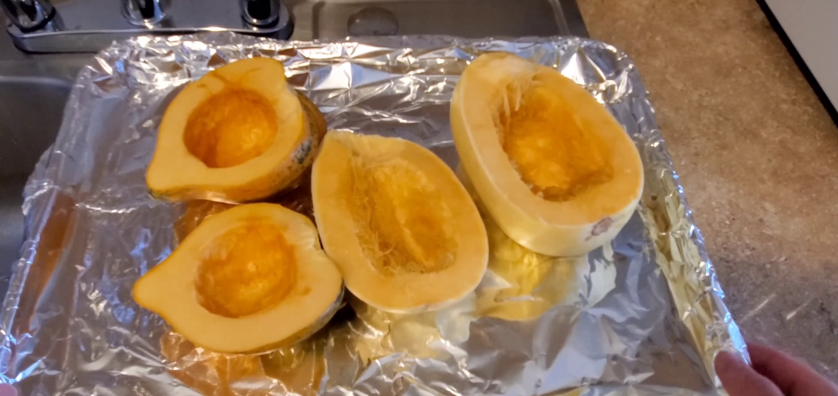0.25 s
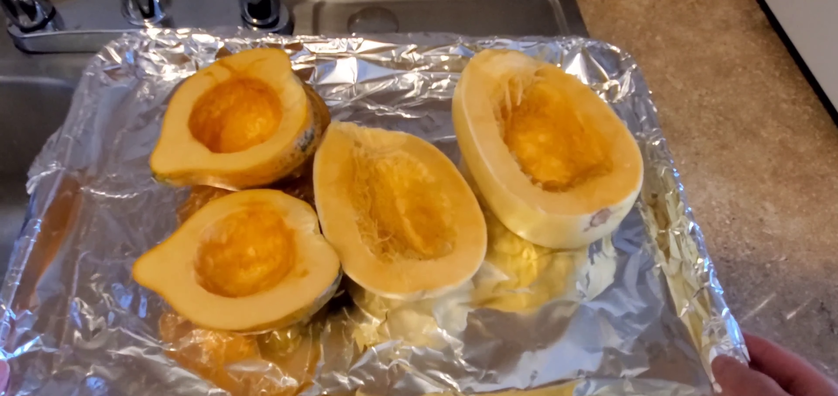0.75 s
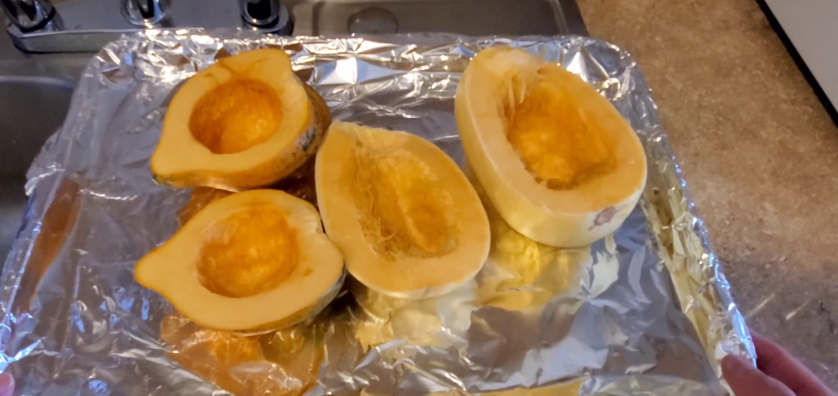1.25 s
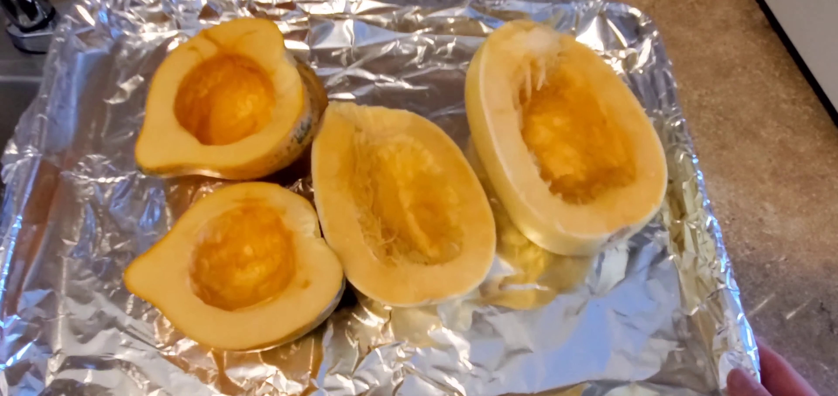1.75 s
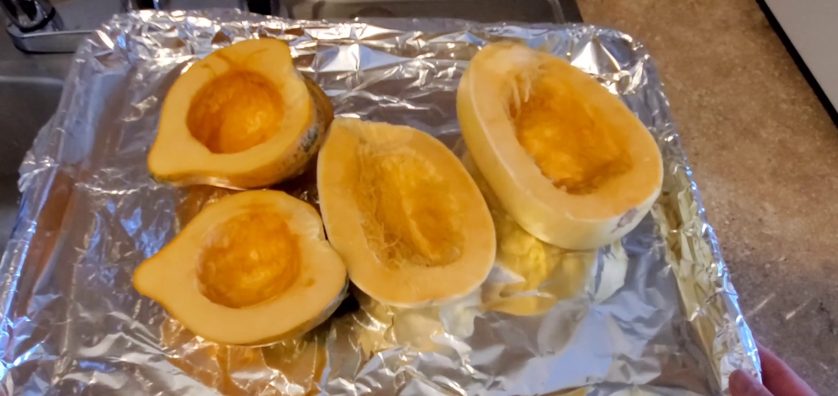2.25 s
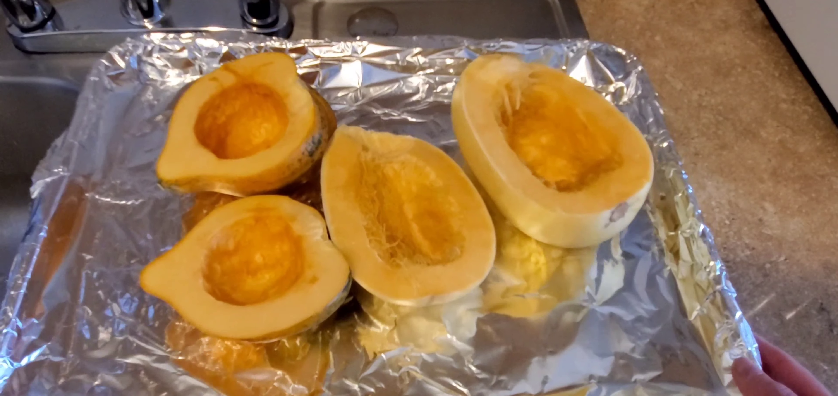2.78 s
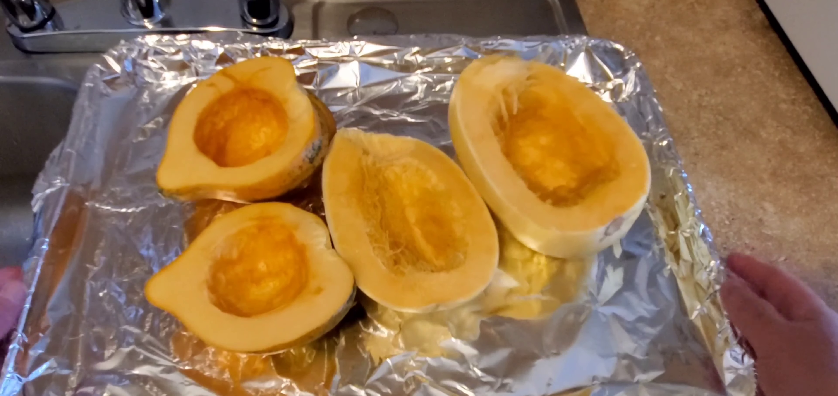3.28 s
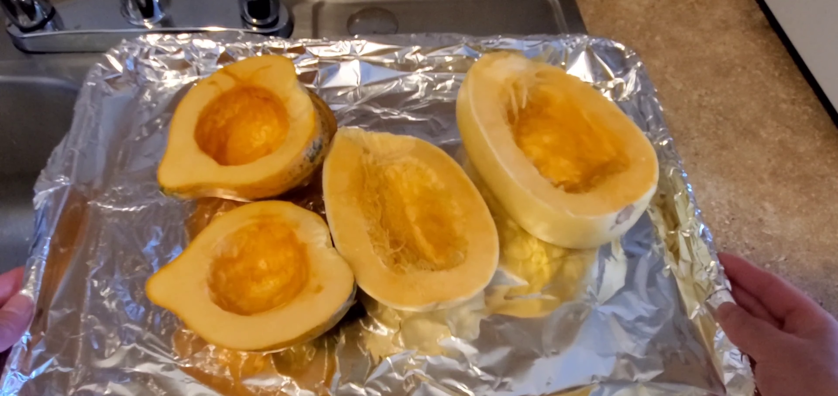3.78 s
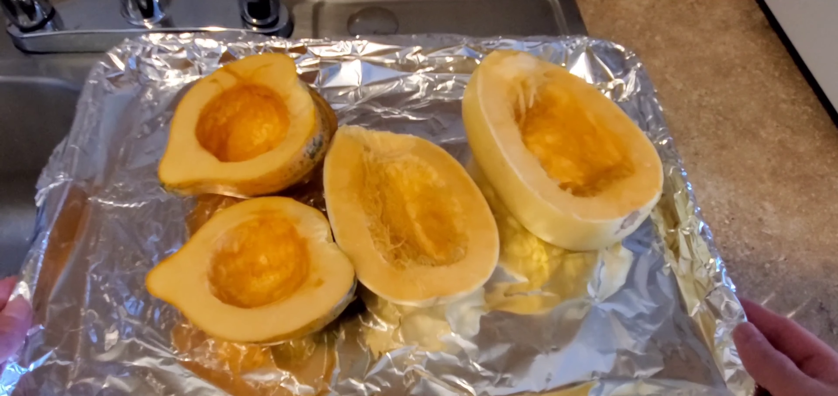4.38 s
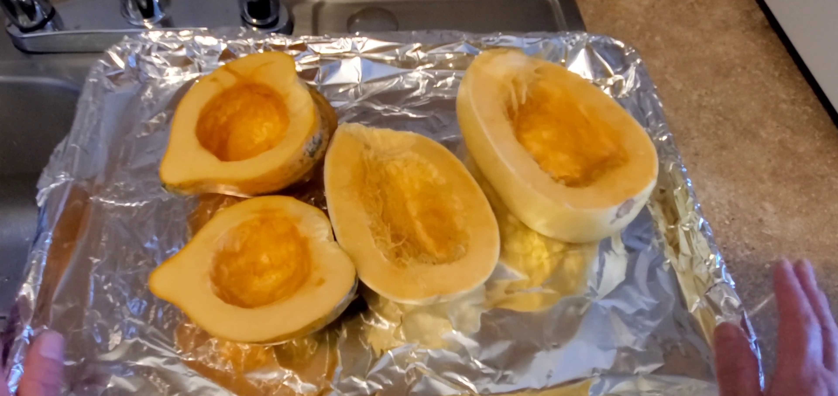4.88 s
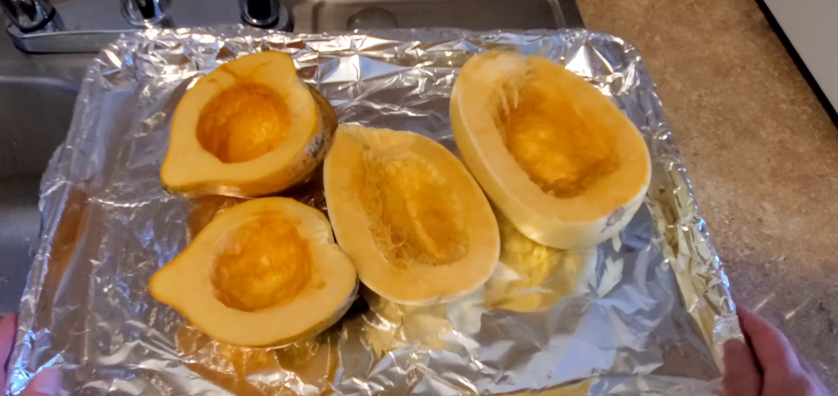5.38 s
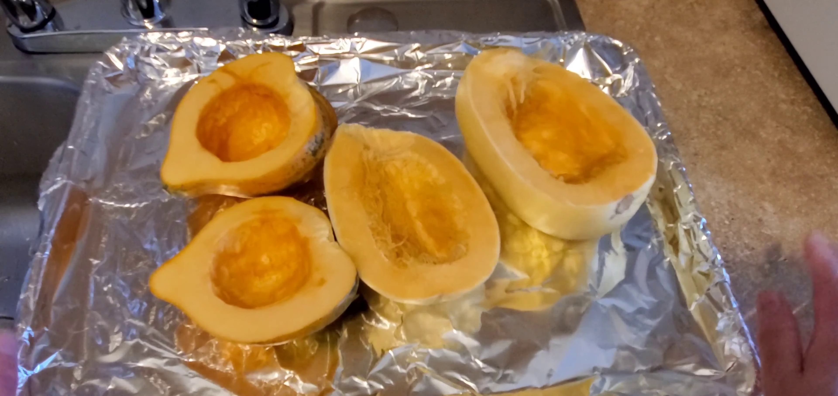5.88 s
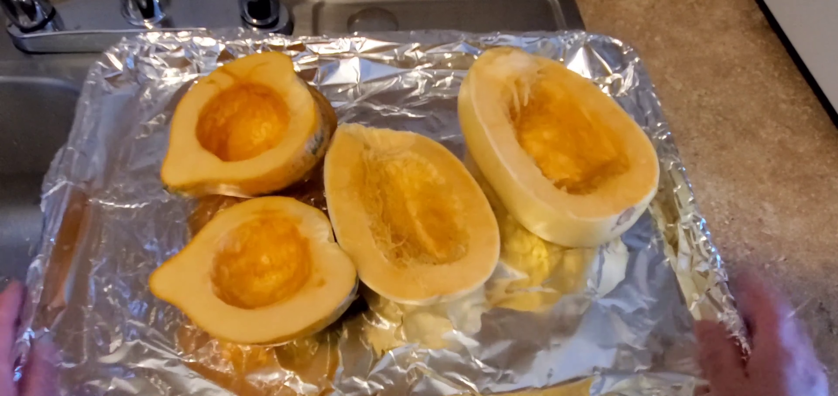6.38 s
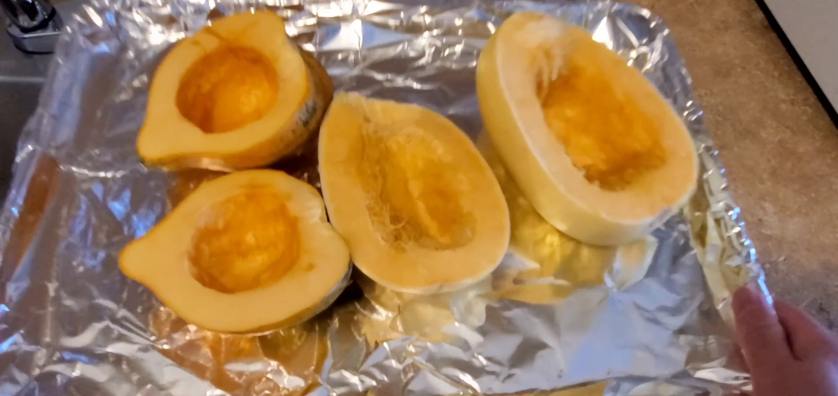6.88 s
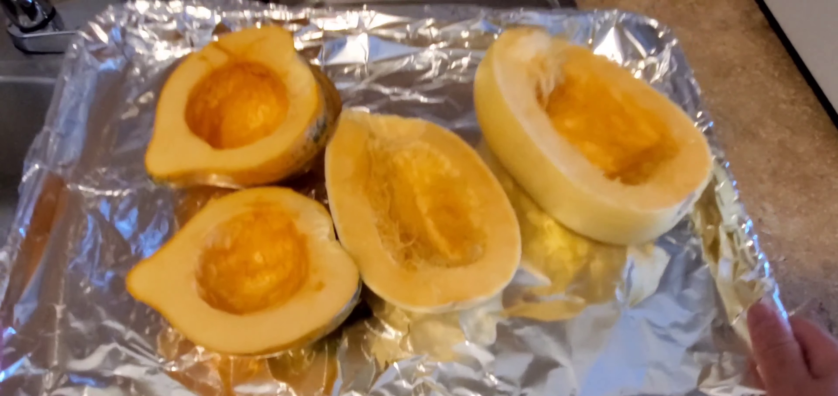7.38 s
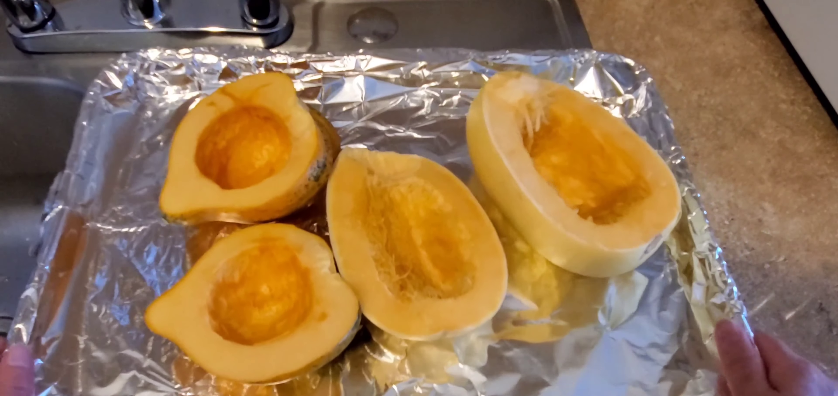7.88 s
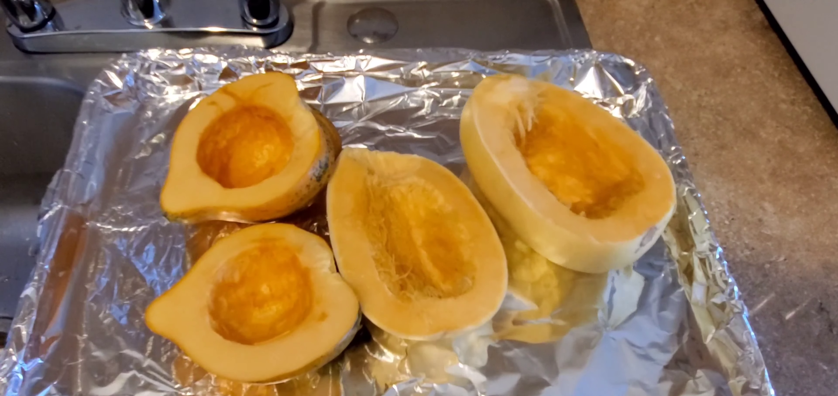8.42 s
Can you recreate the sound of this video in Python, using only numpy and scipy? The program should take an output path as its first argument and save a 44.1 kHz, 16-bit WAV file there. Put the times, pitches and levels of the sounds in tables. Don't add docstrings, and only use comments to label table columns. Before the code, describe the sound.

Aluminium foil crackles, snaps and rustles under moving hands on a loaded baking tray, with metallic knocks and low booms over a quiet kitchen hum.

```python
import sys
import numpy as np
from scipy import signal
from scipy.fft import rfft, irfft, next_fast_len
from scipy.io import wavfile
from scipy.ndimage import uniform_filter1d

SR = 44100
rng = np.random.default_rng(int(sys.argv[2]) if len(sys.argv) > 2 else 0)


def linear_from_db(decibels):
    return 10 ** (np.asarray(decibels, float) / 20)


def generate_wav(sig):
    pcm = np.round(np.clip(np.atleast_2d(sig).T, -1, 1) * 32767).astype(np.int16)
    wavfile.write(sys.argv[1], SR, pcm)


N = 381465
LEFT_HAND_LAG_SAMPLES, RIGHT_HAND_LAG_SAMPLES = -12, 6


def rms_one(x):
    return x / np.sqrt(np.mean(x ** 2) + 1e-20)


def in_time(rows):
    s, level_db = np.transpose(rows)
    return np.interp(np.arange(N) / SR, s, level_db)


def at_hz(points, hz):
    point_hz, value = np.transpose(points)
    return np.interp(np.log(hz + 1), np.log(point_hz), value)


def sides(pan_db):
    return linear_from_db(np.array([.5 * pan_db, -.5 * pan_db]))


def add_at(out, s, sound):
    out[..., round(s * SR):][..., :sound.shape[-1]] += sound


def ring(clicks, hz, t60):
    radius = linear_from_db(-60 / (max(t60, .01) * SR))
    w = 2 * np.pi * hz / SR
    return signal.lfilter([0, np.sin(w)], [1, -2 * radius * np.cos(w), radius ** 2], clicks + 1e-18)


def buckles(count, per_s, spread_db):
    sizes = linear_from_db(spread_db * np.minimum(rng.exponential(1, count), 4)) * rng.choice([-1, 1], count)
    return sizes * (rng.random(count) < per_s / SR)


# frequency in Hz, density in dB per Hz.
AIR_COLOUR = [(12, -39), (20, -24), (43, -3), (91, -14), (233, -7.5), (329, -5.5), (439, -11), (498, -18),
              (545, -11), (586, -15.5), (1500, -27.5), (1950, -71), (3300, -120)]
# frequency in Hz, density in dB per Hz.
HISS_COLOUR = [(880, -24), (1500, 0.5), (3660, -16.5), (6050, -31), (6620, -27), (15100, -19), (16500, -31)]
# frequency in Hz, density in dB per Hz.
LATE_HISS_COLOUR = [(1500, -30), (2300, -8), (3600, -10), (5500, -12), (8500, -20), (12000, -13),
                    (15700, -18), (16500, -40)]
# frequency in Hz, likeness from 0 to 1.
AIR_LIKENESS = [(60, 0.74), (240, 1), (950, 0.61), (3770, 0.19), (15000, 0.04)]
# frequency in Hz, width in Hz, level in dB.
HUM_LINES = [(436.9, 4.1, -63), (545, 11, -71.5), (320, 17, -67.5)]


def air():
    air_db, hiss_db, late_hiss_db = -57, -75, -69.5
    whine_hz, whine_db, whine_late_db = 1179, -81.5, -69.5
    up_s, rise_s = 8.2, 0.09
    t, fast = np.arange(N) / SR, next_fast_len(N)
    late = np.interp(t, [up_s - rise_s, up_s + rise_s], [0, 1])
    hz = np.fft.rfftfreq(fast, 1 / SR)
    alike = np.clip(at_hz(AIR_LIKENESS, hz), 0, 1)
    layers = (
        (AIR_COLOUR, air_db),
        (HISS_COLOUR, hiss_db),
        (LATE_HISS_COLOUR, late_hiss_db - 40 * (1 - late) ** 3),
    )
    out = np.zeros((2, N))
    for colour, level_db in layers:
        mid, side = rfft(rng.standard_normal((2, fast)))
        pair = np.sqrt(1 + alike) * mid + np.sqrt(1 - alike) * side * [[1], [-1]]
        noise = irfft(pair * linear_from_db(at_hz(colour, hz)), fast)[:, :N]
        out += linear_from_db(level_db) * rms_one(noise)
    for line_hz, width_hz, line_db in HUM_LINES:
        out += linear_from_db(line_db) * rms_one(ring(rng.standard_normal((2, N)), line_hz, 1.8 / width_hz))
    whine = np.sqrt(2) * np.sin(2 * np.pi * whine_hz * t)
    return out + linear_from_db(whine_db + (whine_late_db - whine_db) * late) * whine


# frequency in Hz, density in dB per Hz.
FOIL_COLOUR = [(290, -42), (500, -13.5), (980, -11.5), (1120, -4.5), (1870, -7.5), (2320, -6), (4050, -6.5),
               (6380, -11), (15100, -17.5), (15800, -21.5), (16500, -57)]


def sheet_ring(clicks, t60, low_db, top_db, lag, alike, facets_db):
    low_hz, top_hz = 1800, 8000
    damped_s = 0.12
    size = len(clicks)
    fast = next_fast_len(size)
    hz, t = np.fft.rfftfreq(fast, 1 / SR), np.arange(5000) / SR
    same, left, right = rfft(rng.standard_normal((3, fast)))
    late = np.exp(-2j * np.pi * hz * lag / SR)
    shared = same * np.array([late, np.ones_like(late)])
    pair = np.sqrt(alike) * shared + np.sqrt(1 - alike) * np.array([left, right])
    facets = np.interp(np.sqrt(hz), np.linspace(20, 130, 28), rng.standard_normal(28))
    pair = pair * linear_from_db(at_hz(FOIL_COLOUR, hz) + facets_db * facets)
    low = 1 / (1 + (hz / low_hz) ** 6)
    top = 1 / (1 + (top_hz / (hz + 1)) ** 6)
    bands = np.array([low, 1 - low - top, top])
    parts = irfft(pair * bands[:, None], fast)[..., :size]
    crack = (1 - np.exp(-t / .001)) * (1 + 1.66 * np.exp(-t / 0.0025))
    band_t60 = t60 * np.array([[.95], [1.01], [.8]])
    decays = crack * linear_from_db(-60 * t / band_t60 - 20 * (t / damped_s) ** 3)
    power = signal.fftconvolve(clicks[None] ** 2, decays ** 2, axes=1)[:, :size]
    loud = np.sqrt(np.maximum(power, 0)) / parts.std(axis=(1, 2))[:, None]
    return linear_from_db(low_db) * loud[0] * parts[0] + loud[1] * parts[1] + linear_from_db(top_db) * loud[2] * parts[2]


# time in seconds, crackle level in dB.
RUSTLE_CURVE = [(0.0, -72.5), (0.41, -51.5), (0.58, -60), (1.13, -53), (2.48, -77), (2.91, -51),
                (3.93, -67), (4.12, -64), (5.68, -56), (5.85, -68), (6.12, -71.5), (6.26, -44.5),
                (6.53, -45), (7.3, -65), (7.98, -58), (8.2, -70), (8.65, -74)]


def rustle():
    level_db = in_time(RUSTLE_CURVE)
    top_db = -7.5 + 0.32 * (level_db + 63)
    both = np.zeros((2, N))
    for lag in (LEFT_HAND_LAG_SAMPLES, RIGHT_HAND_LAG_SAMPLES):
        clicks = buckles(N, per_s=150, spread_db=4.0)
        both += sheet_ring(clicks, 0.14, -3, top_db, lag, alike=0.11, facets_db=-1.0)
    return linear_from_db(level_db - 20.5) * sides(2.7)[:, None] * both


def pings(foil):
    low_hz, top_hz, cycles, level_db = 2200, 6000, 70, -14
    pitches_hz = np.geomspace(low_hz, top_hz, 16) * rng.uniform(.95, 1.05, 16)
    pops = buckles(N, per_s=160, spread_db=4.0)
    dealt = rng.integers(0, len(pitches_hz), N)
    out = np.zeros((2, N))
    for k, hz in enumerate(pitches_hz):
        out += sides(rng.normal(0, 6))[:, None] * ring(pops * (dealt == k), hz, cycles / hz)
    moving = uniform_filter1d(foil ** 2, size=500, origin=249)
    return linear_from_db(level_db) * rms_one(out) * np.sqrt(np.abs(moving))


def spikes(foil):
    band_hz, level_db = [3000, 14000], -10
    pair = np.zeros((2, N))
    for lag in (LEFT_HAND_LAG_SAMPLES, RIGHT_HAND_LAG_SAMPLES):
        kinks = buckles(N, per_s=260, spread_db=3.4)
        pair += np.array([np.roll(kinks, lag), kinks])
    band = signal.butter(2, band_hz, "band", fs=SR, output="sos")
    pair = signal.sosfilt(band, pair + 1e-18)
    moving = uniform_filter1d(foil ** 2, size=200)
    return linear_from_db(level_db) * rms_one(pair) * np.sqrt(np.abs(moving))


# time in seconds, level in dB.
ROCKING_CURVE = [(0.0, -49.5), (0.43, -59.5), (6.12, -58.5), (6.29, -40), (6.7, -58), (6.91, -64),
                 (7.85, -47.5), (8.12, -54.5), (8.65, -49.5)]
# frequency in Hz, level in dB, t60 in seconds.
FIRST_BOOM = [(85.3, 3.5, 0.23), (108, -7.5, 0.26), (69.5, -11.5, 0.23)]
# frequency in Hz, level in dB, t60 in seconds.
SECOND_BOOM = [(167.2, 2, .23), (156, -8.5, 0.36)]


def rocking():
    out, rock_db = np.zeros(N), in_time(ROCKING_CURVE)
    for modes, level_db in ((FIRST_BOOM, rock_db), (SECOND_BOOM, rock_db - 14.5)):
        shake = rng.standard_normal(N)
        murmur = sum(linear_from_db(mode_db) * ring(shake, hz, t60) for hz, mode_db, t60 in modes)
        out += linear_from_db(level_db) * rms_one(murmur)
    return out


def creases(table, first, swelling, gain_db, size):
    out, t = np.zeros((2, N + size)), np.arange(size) / SR
    for s, peak_db, low_db, top_db, run_s, pan_db in table:
        lag = LEFT_HAND_LAG_SAMPLES if pan_db > 2.7 else RIGHT_HAND_LAG_SAMPLES
        done = t / np.clip(run_s, .001, .15)
        run = buckles(size, per_s=569, spread_db=4.0) * np.exp(-done ** 3) * (1 - np.exp(-done / swelling))
        run[0] = first
        one = sheet_ring(run, 0.15, low_db, top_db, lag, alike=0.16, facets_db=2.7)
        add_at(out, s, linear_from_db(peak_db + gain_db) * sides(pan_db)[:, None] * one)
    return out[:, :N]


# start in seconds, peak in dB, low part in dB, top part in dB.
LEFT_SNAPS = [(0.1406, -47, -22, -13), (0.9106, -35.5, -28, 1), (1.0224, -41, -9, -4.5),
              (1.1162, -28, -22, -5), (1.3598, -35, -20, -24), (1.511, -54, -13, -5),
              (1.9153, -37, -9, 2.5), (2.02, -52.5, -14.5, -10), (2.7294, -33.5, -19, -17),
              (2.9363, -37, -9, 6.5), (3.065, -25.5, -16, -15), (3.0845, -19, -15, -4),
              (3.3343, -40.5, -25, -15), (3.3523, -35, -15, -10), (4.0032, -39.5, -21, -17),
              (4.0778, -30.5, -13.5, -1.5), (4.2288, -39, -18, -7), (4.2602, -37, -19, -2.5),
              (4.322, -40, -19, 0), (4.5034, -43, -28, -6), (4.7431, -25, -6, -4.5), (4.9572, -27, -13, -3),
              (5.087, -48.5, -17, -10), (5.3173, -46, -16, -8), (5.594, -35, -20, 0),
              (7.3886, -49, -6, -13), (7.8897, -30, 0, -2), (8.0056, -42, -32, 6.5),
              (8.079, -24.5, -8, -11.5)]
# start in seconds, peak in dB, low part in dB, top part in dB.
RIGHT_SNAPS = [(0.2618, -32, -11, -4), (0.4231, -24.5, -16.5, -4), (0.5038, -34, -6, -1),
               (0.5423, -33, -13.5, 1.5), (0.7617, -35.5, -15, 0.5), (0.7772, -30, -11, -23),
               (1.276, -33.5, -13.5, 1.5), (1.5567, -25, -19, 1.5), (1.7822, -37.5, -14, -20.5),
               (2.7501, -26, -5, -3), (2.8282, -32.5, -8, 0), (3.5544, -36, -10.5, -0.5),
               (4.2895, -34, -9, -5), (4.5566, -33.5, -13.5, -9), (4.9841, -25.5, -8, -6),
               (5.342, -31.5, -15.5, -12), (5.524, -29, -23, -7), (5.5498, -27, -22, -11.5),
               (6.0762, -16.5, -5, -5.5), (6.094, -17.5, -25, 2.5), (6.2675, -25, -8.5, -2.5),
               (6.4282, -31, -3, -4.5), (6.607, -30.5, -18.5, 5.5), (6.7109, -34, -9, -2),
               (6.747, -32.5, -16, 5.5), (6.9034, -30.5, -16, -2), (7.0767, -35.5, -22, -4.5),
               (7.4859, -25, -11, -1.5), (7.7892, -31.5, -26, -1.5), (7.9551, -29.5, -6, -5)]
# start in seconds, peak in dB.
TICKS = [(0.1822, -42.5), (0.3391, -39), (0.7172, -41.5), (0.8813, -40), (1.6643, -45), (1.765, -46),
         (2.506, -43.5), (2.902, -45), (2.9864, -37.5), (3.446, -44.5), (3.4706, -38), (3.614, -49),
         (3.7514, -45), (4.0624, -36), (4.3395, -34), (4.6754, -38), (5.18, -41), (5.2485, -43.5),
         (5.436, -36.5), (5.4987, -33.5), (5.7196, -36), (5.7521, -39.5), (6.3387, -38.5), (6.5372, -38),
         (6.5744, -36), (6.862, -46.5), (7.1637, -46.5), (7.4135, -43), (7.645, -36), (7.8402, -36)]


def snaps():
    left_pan_db, right_pan_db = 3.5, 1.22
    snap_run_s, tick_run_s = .012, 0.02
    tick_low_db, tick_top_db = -13.5, -6.5
    sudden = [(*row, snap_run_s, left_pan_db) for row in LEFT_SNAPS]
    sudden += [(*row, snap_run_s, right_pan_db) for row in RIGHT_SNAPS]
    sudden += [(s, db, tick_low_db, tick_top_db, tick_run_s, right_pan_db) for s, db in TICKS]
    return creases(sudden, first=3.41, swelling=0.066, gain_db=-21, size=5120)


# start in seconds, peak in dB, top part in dB, run in seconds, left-right in dB.
FOLDS = [(0.151, -36, -10.5, 0.12, 4.5), (0.3, -41, -10, 0.08, 1.5), (1.1189, -25.5, -7.5, 0.093, 2.5),
         (2.027, -47.5, -34, 0.014, 3), (2.489, -37, -31, .05, 2), (2.6988, -41, -11, 0.039, 3.5),
         (3.0642, -20.5, -13, 0.042, 5), (3.3786, -42, -11, 0.078, 2), (3.949, -45.5, 1, 0.16, 2.5),
         (4.6753, -31.5, -6, 0.054, 3.5), (4.9248, -38, 0, 0.055, 6.5), (5.5004, -28, -1, 0.066, 0),
         (5.5683, -26, -5.5, 0.054, 2.4), (5.7527, -36, -5, 0.083, 5), (5.8094, -42, -20, 0.042, 1),
         (6.0654, -20, -10.5, 0.097, 1.5), (6.4282, -24, -6.5, 0.045, -0.5), (7.0409, -41, -23, 0.095, 2.1),
         (7.643, -29, -18, .03, .1), (7.7926, -32, -10.5, 0.087, 0.5), (7.8918, -31, -16.5, 0.08, 1)]


def folds():
    slow = [(s, db, -17.5 - .6 * top_db, top_db, run_s, pan_db) for s, db, top_db, run_s, pan_db in FOLDS]
    return creases(slow, first=0, swelling=0.096, gain_db=-27, size=9216)


# start in seconds, peak in dB, frequency in Hz.
PATCHES = [(0.2635, -26, 2990), (0.4231, -24, 3310), (0.5034, -30, 1730), (0.5433, -28, 4580),
           (0.7588, -30, 7960), (0.7783, -28, 2580), (0.8821, -39, 2610), (0.9105, -32, 7680),
           (1.1011, -28, 4070), (1.118, -26, 2450), (1.2772, -31, 1740), (1.362, -32, 3050),
           (1.558, -22, 5400), (1.6643, -41, 4820), (1.9167, -34, 3280), (2.4879, -32, 1520),
           (2.7304, -25, 2580), (2.7513, -23, 2430), (2.8286, -30, 1790), (2.9384, -30, 6980),
           (3.0656, -19, 3130), (3.0845, -15, 3920), (3.3539, -32, 2730), (3.4692, -35, 4300),
           (3.5565, -31, 4010), (4.003, -37, 3040), (4.0638, -31, 5280), (4.0788, -23, 5370),
           (4.2294, -35, 3840), (4.2604, -33, 3830), (4.5043, -42, 4050), (4.5577, -33, 2240),
           (4.6764, -33, 3360), (4.7423, -19, 3460), (4.9583, -20, 3410), (4.9817, -20, 2720),
           (5.1813, -36, 4870), (5.3419, -31, 3120), (5.4382, -36, 2360), (5.5011, -31, 2690),
           (5.5235, -28, 2720), (5.5494, -25, 2360), (5.5953, -26, 3040), (5.7201, -33, 4380),
           (6.0762, -16, 1560), (6.0952, -13, 3970), (6.2683, -23, 1670), (6.6075, -26, 5820),
           (6.7118, -29, 5610), (6.7447, -29, 7150), (6.9049, -30, 4860), (7.076, -33, 5010),
           (7.4132, -39, 3590), (7.4875, -21, 5470), (7.6497, -32, 1850), (7.7909, -28, 5400),
           (7.8916, -27, 1580), (7.956, -28, 2730), (8.0069, -29, 4100), (8.0807, -22, 3710)]


def patches():
    gain_db, t60_s, spread, shake_s = -21, .045, .05, .012
    out, t = np.zeros((2, N + 4000)), np.arange(4000) / SR
    for s, db, hz in PATCHES:
        shake = rng.standard_normal((2, 4000)) * np.exp(-t / shake_s)
        one = sum(ring(shake, hz * (1 + spread * off), t60_s) for off in rng.uniform(-1, 1, size=3))
        add_at(out, s, linear_from_db(db + gain_db) * one / one[:, :1000].std())
    return out[:, :N]


# start
# in seconds, peak in dB, frequency in Hz, t60 in seconds.
CRACKS = [(2.4882, -17, 1300, .012), (2.4885, -28, 3200, .01), (2.498, -27, 1400, .03),
          (7.6445, -33, 1500, .04), (7.652, -24, 1600, .012), (7.653, -32, 540, .05),
          (7.657, -38, 900, .04), (7.655, -23, 280, .14), (7.66, -26, 235, .16), (7.654, -28, 325, .1),
          (2.489, -28, 390, .08), (2.491, -23, 560, .07), (2.495, -25, 300, .12), (2.49, -31, 1850, .03),
          (.2645, -32, 7500, .01), (.7785, -31, 2600, .01), (8.0065, -33, 6000, .012),
          (2.492, -26, 750, .06), (6.078, -36, 230, .08), (6.272, -40, 960, .06), (6.425, -42, 570, .05),
          (4.742, -36, 700, .04)]


def cracks():
    out, t = np.zeros(N + 4000), np.arange(4000) / SR
    for s, db, hz, t60 in CRACKS:
        add_at(out, s, linear_from_db(db - 60 * t / t60) * np.sin(2 * np.pi * hz * t))
    return out[:N]


def swell(click, hz, t60, build_s):
    fed = ring(click, hz, build_s)
    return ring(fed, hz, t60) * 2 * np.log(1000) / (build_s * SR)


# frequency in Hz, level in dB, t60 in seconds.
CLACK_MODES = [(219, 2, 0.19), (277, 3.5, 0.18), (321, 4.5, 0.11), (415, -8, 0.12), (462.3, -1.5, 0.098),
               (553, -5.5, 0.046), (641, -5, 0.11), (811, -5, 0.09), (924, -4.5, 0.054), (1082, -10, 0.035),
               (1260, -3.5, 0.039), (1320, -2.5, 0.075), (1480, -3, 0.057), (1850, -1.5, 0.035),
               (2650, -11, .03), (3300, -13.5, 0.016)]


def clack(contacts, thud_db, clack_db):
    thud_top_hz, detune, damping = 420, .04, .25
    t, modes = np.arange(5000) / SR, np.zeros(5000)
    for hz, mode_db, t60 in CLACK_MODES:
        twins_hz = hz * rng.normal(1, detune, (2, 1))
        twins = np.sin(2 * np.pi * twins_hz * t).sum(axis=0) * rng.choice([-1, 1])
        part_db = thud_db if hz < thud_top_hz else clack_db
        loaded_t60 = t60 * (thud_top_hz / hz) ** damping
        modes += twins * linear_from_db(part_db + mode_db - 11.5 - 60 * t / loaded_t60)
    return signal.fftconvolve(modes, contacts)[:5000]


# start in seconds, peak in dB, second boom in dB, thud in dB, clack in dB.
BLOWS = [
    (0.499, -54.5, 7, -4, 5),
    (2.4885, -26, 6.5, 0.5, 6),
    (4.741, -60, 5, 16, 16),
    (6.427, -42, 5, -8, -0.5),
    (7.494, -47, 2.5, -9, 2),
    (7.652, -24, 0, -2.5, -6),
]
# start in seconds, peak in dB, boom in Hz, second boom in dB.
BUMPS = [(0.746, -43, 83, -20), (1.071, -38, 84.4, -15.5), (2.872, -38.5, 91, -10.5), (2.98, -30, 98.7, -4),
         (3.079, -45, 90.8, -10), (3.341, -28, 91.2, -7), (4.968, -34.5, 89.5, -0.5), (5.15, -42, 99, -4),
         (5.38, -39, 87, -7.5), (5.554, -43.5, 90, -6), (6.106, -26, 85, -1.5), (6.279, -39, 99, -8),
         (6.336, -42, 89.4, -14), (6.454, -31, 74.8, 0), (6.81, -49.5, 78, -28), (6.15, -40, 90, -4),
         (6.53, -46, 85, -6), (3.03, -44, 85, -6), (1.19, -45, 80, -14), (6.23, -40, 92, -8),
         (5.03, -44, 88, -4), (6.195, -40, 85, -8), (6.39, -44, 85, -6), (8.44, -46, 90, -12),
         (6.64, -51, 85, 6), (1.9, -56, 80, 5.5), (2.75, -52, 85, 7)]


def knocks():
    blow_hz, bump_thud_db, bump_clack_db = 96, -14.5, -13.5
    blow_stifled_s, bump_stifled_s = .3, .2
    size = 12000
    out, click, t = np.zeros(N + size), np.eye(1, size)[0], np.arange(size) / SR
    hits = [(s, db, blow_hz, *levels_db, blow_stifled_s) for s, db, *levels_db in BLOWS]
    hits += [(*row, bump_thud_db, bump_clack_db, bump_stifled_s) for row in BUMPS]
    second = sum(linear_from_db(mode_db) * swell(click, hz, t60, build_s=0.054) for hz, mode_db, t60 in SECOND_BOOM)
    for s, peak_db, boom_hz, second_db, thud_db, clack_db, stifled_s in hits:
        one = linear_from_db(second_db) * second
        for hz, mode_db, t60 in FIRST_BOOM:
            one += linear_from_db(mode_db) * swell(click, hz * boom_hz / 86, t60, build_s=0.057)
        contacts = click[:900] + buckles(900, per_s=250, spread_db=2.5) * 0.26
        one[:5000] += clack(contacts, thud_db, clack_db)
        add_at(out, s, linear_from_db(peak_db - 20 * (t / stifled_s) ** 2) * one)
    return out[:N]


# start in seconds, length in seconds, first Hz, last Hz, level in dB.
SQUEAKS = [
    (3.939, 0.046, 2700, 2700, -63.5),
    (4.077, 0.074, 5200, 5240, -57.5),
    (8.42, .1, 3080, 4030, -69),
    (8.487, 0.128, 3240, 3100, -68),
]


def squeaks():
    size, width_hz = SR // 4, 120
    slow = signal.butter(2, width_hz, fs=SR, output="sos")
    out = np.zeros(N + SR)
    for s, length_s, first_hz, last_hz, db in SQUEAKS:
        done = np.minimum(np.arange(size) / SR / length_s, 1)
        phase = 2 * np.pi * np.cumsum(first_hz + (last_hz - first_hz) * done) / SR
        a, b = rms_one(signal.sosfilt(slow, rng.standard_normal((2, size))))
        tone = a * np.sin(phase) + b * np.cos(phase)
        add_at(out, s, linear_from_db(db) * np.sin(np.pi * done) * tone)
    return out[:N]


# Hz, t60 in seconds, level in dB, rise in seconds, 20 dB fall in seconds.
GROAN_MODES = [(170.6, 0.54, 0, 0.033, 0.19), (626, 0.2, -9, .012, 0.08), (821.6, 0.19, -21, .012, 0.24),
               (1000, 0.15, -13, 0.0076, 0.0071), (270, .2, -12, .04, .05)]
# start in seconds, hold in seconds, level in dB, share of the fall time.
GROANS = [
    (6.901, 0.05, -45, .25),
    (7.037, 0.076, -43, 1.01),
]


def groans():
    half = SR // 2
    out, t = np.zeros(N + SR), np.arange(half) / SR
    for hz, t60, mode_db, rise_s, fall_s in GROAN_MODES:
        for s, hold_s, db, share in GROANS:
            flex = ring(rng.standard_normal(SR), hz, t60)[half:]
            flex = flex / np.sqrt(uniform_filter1d(flex ** 2, size=800))
            fall_db = -20 * np.maximum(t - hold_s, 0) / (fall_s * share)
            add_at(out, s, np.clip(t / rise_s, 0, 1) * linear_from_db(db + mode_db + fall_db) * flex)
    return out[:N]


def kitchen(x):
    t60_s, wall_cut_hz = 0.29, 9900
    hz = np.fft.rfftfreq(32768, 1 / SR)
    t60 = t60_s / (1 + hz / wall_cut_hz)
    wet = np.zeros((2, len(hz)), complex)
    for k, lag_s in enumerate(rng.uniform(0.0054, 0.024, size=16)):
        loop = linear_from_db(-60 * lag_s / t60) * np.exp(-2j * np.pi * hz * lag_s)
        wet[k % 2] += loop / (1 - loop) * (-1) ** (k // 2)
    return signal.fftconvolve(x[None], irfft(wet)[:, :24000], axes=1)[:, :N]


def scene():
    foil = rustle() + linear_from_db(-0.4) * (snaps() + folds())
    foil = foil + pings(foil) + spikes(foil) + patches() * sides(2.0)[:, None] + squeaks()
    rumble_cut = signal.butter(2, 50, "high", fs=SR, output="sos")
    tray = signal.sosfilt(rumble_cut, rocking() + knocks() + groans()) + cracks()
    wet = kitchen(linear_from_db(-15.5) * foil.mean(axis=0) + linear_from_db(-25) * tray)
    return air() + foil + tray * sides(1.0)[:, None] + wet


def band_limit(x):
    return signal.sosfilt(signal.butter(12, 17000, fs=SR, output="sos"), x)


# frequency in Hz, left-right level in dB.
MICROPHONE_LEAN = [(100, 0), (300, 2.5), (1000, -1), (2800, 1.5), (9000, -1), (13000, 1.5)]


def record(dry):
    size = next_fast_len(N)
    lean_db = at_hz(MICROPHONE_LEAN, np.fft.rfftfreq(size, 1 / SR))
    heard = irfft(rfft(dry, size) * sides(lean_db), size)[:, :N]
    return band_limit(heard)


dry = scene()
out = record(dry)
generate_wav(out)
```